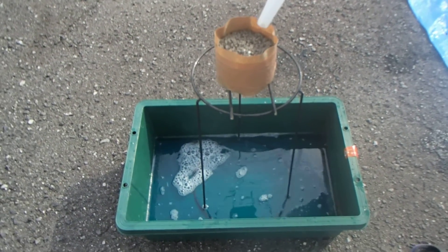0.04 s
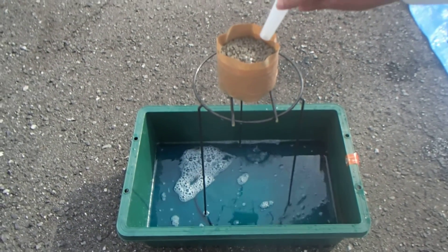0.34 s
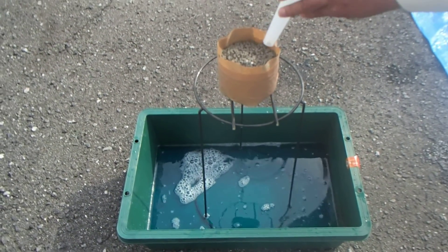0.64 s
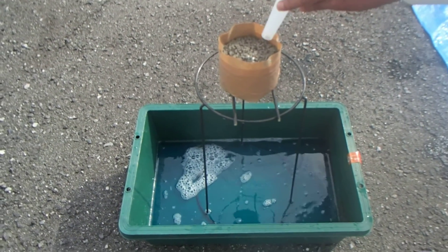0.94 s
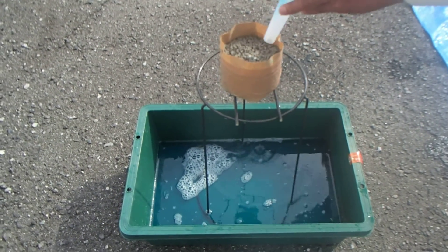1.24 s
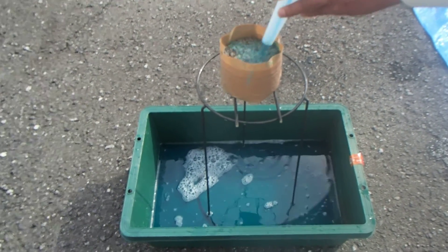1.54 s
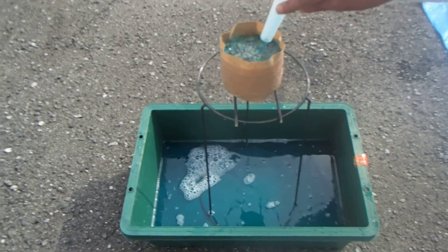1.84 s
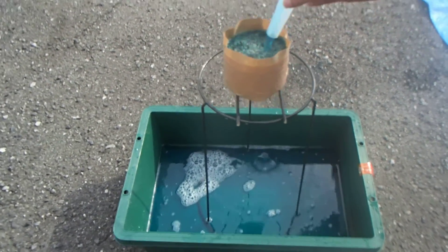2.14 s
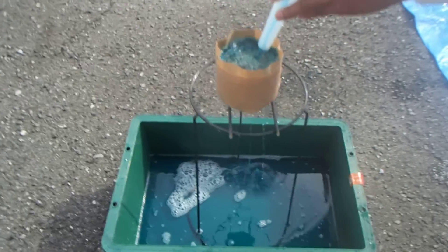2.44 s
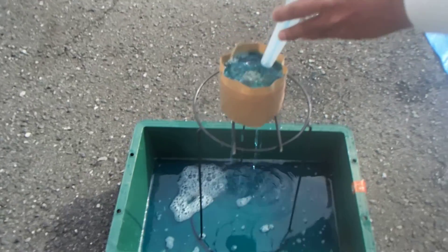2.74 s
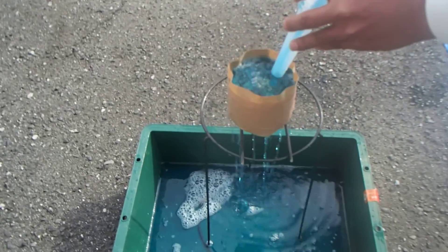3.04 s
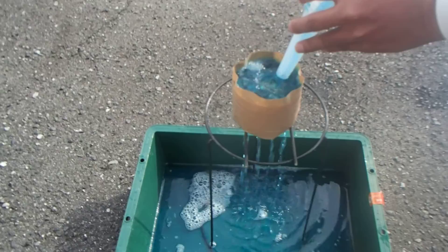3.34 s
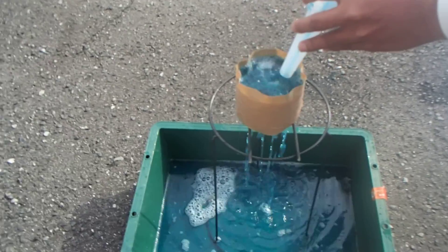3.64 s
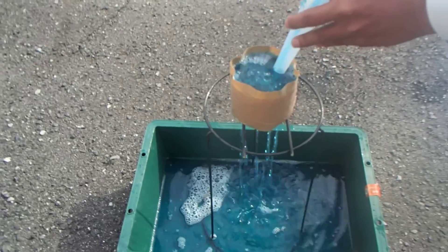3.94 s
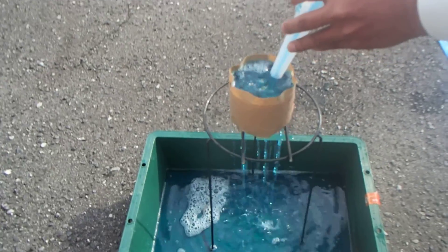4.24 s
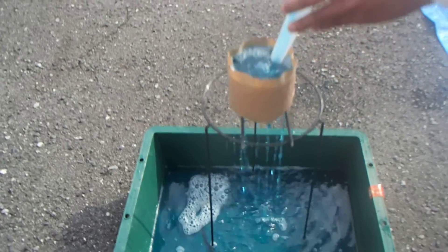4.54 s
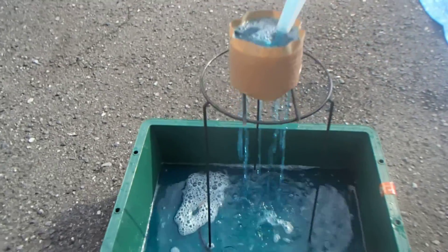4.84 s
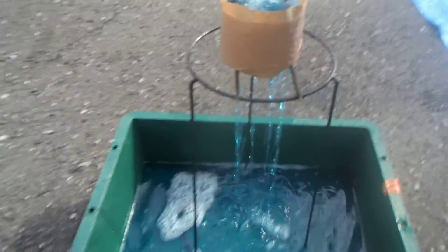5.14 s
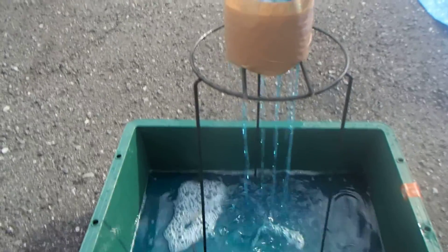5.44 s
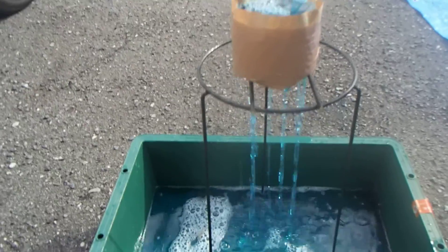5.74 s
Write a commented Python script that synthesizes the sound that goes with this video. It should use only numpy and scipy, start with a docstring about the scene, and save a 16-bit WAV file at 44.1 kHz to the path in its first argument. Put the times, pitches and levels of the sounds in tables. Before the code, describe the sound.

Water from a hose fills a perforated cup, dripping and then streaming into a tub of water outdoors with bright splashing and gurgling.

```python
"""Water drips, then streams from a perforated cup into a plastic tub as a hose fills the cup.
Outdoors, close to the microphone, each splash is a tick, a puff of spray and a few ringing air
bubbles, echoed by the tub walls; one flow drives both the splashing and the gurgling.
Far behind, a car fades into the hush of the street, and now and then air bumps the microphone."""
import sys
import numpy as np
from scipy import signal
from scipy.fft import rfft, irfft
from scipy.io import wavfile
from scipy.ndimage import uniform_filter1d

SR = 44100
rng = np.random.default_rng(int(sys.argv[2]) if len(sys.argv) > 2 else 0)


def log_audio(samples):
    """Write samples as a 16-bit WAV file to the path given in sys.argv[1]."""
    # one column per channel
    frames = np.atleast_2d(samples).T
    # limit to full scale, then quantise
    limited = np.clip(frames, -1, 1)
    pcm = np.round(limited * 32767).astype(np.int16)
    wavfile.write(sys.argv[1], SR, pcm)


N = 263718
T = np.arange(N) / SR
TRICKLE_S, OPENING_S = 2.5, 0.8  # the holes start to trickle, and take this long to run freely


# Tone of the splashing, close up: f/Hz, level/dB
SPLASH_SPECTRUM = [(250, -20.5), (480, -7.5), (760, -22), (1500, -13), (2150, -8), (3100, 1), (3800, 3.5),
                   (4150, -3), (4800, 4), (6200, 4), (7100, -0.5), (10500, 1), (12000, -10.5), (15500, -14)]
# First dribbles from the cup: t/s, half length/s, level/dB
FIRST_DRIBBLES = [(2.137, .04, -38.5), (2.798, 0.044, -44)]

def streams(open_db=-32, surge_db=3.0):
    """Near the microphone, wobbling streams from the holes break into beads and splash into the tub."""
    per_s = np.interp(T, [TRICKLE_S, TRICKLE_S + OPENING_S], [100, 230])
    splashes = beads(per_s, scatter_db=5.5, cycles=6.0, tick_db=-14, low_hz=2013)
    splashes = colour(splashes, SPLASH_SPECTRUM) * undb(surge_db * drift(50))
    dribbles = sum(undb(db) * bell_curve(s, half_s) for s, half_s, db in FIRST_DRIBBLES)
    return even(splashes, 0.082) * (undb(open_db + flow_db() + lulls_db()) + dribbles)


def beads(per_s, scatter_db, cycles, tick_db, low_hz, high_hz=13700, spray_db=-15.5, lag_s=.004):
    """Each bead of water lands with a tick, throws spray and leaves three small bubbles ringing."""
    landed = np.cumsum(per_s) / SR
    out = np.zeros(N)
    for k in range(int(landed[-1])):
        s = np.searchsorted(landed, k + 4 * rng.random()) / SR
        size = undb(scatter_db * np.clip(rng.standard_normal(), -2, 1.6))
        add(out, s, size * (undb(tick_db) * burst(0.00026) + undb(spray_db) * burst(0.0024)))
        for place, late, loud, damping in rng.random(size=(3, 4)):
            hz = low_hz + (high_hz - low_hz) * place ** 1.312
            gain = size * undb(8 * (loud - 1)) * np.sqrt(hz / high_hz)
            ring = bubble(hz, cycles * 2 ** (2 * damping - 1))
            add(out, s - lag_s * np.log(1 - late), gain * ring)
    return out


def bubble(hz, cycles, rise=0.041, swell=0.67, fall=1.11):
    """Trapped air swells within a cycle or so, rings down and rises in pitch as it nears the surface."""
    age = np.arange(int(6 * cycles * SR / hz) + 8) * hz / SR  # in cycles
    envelope = (1 - np.exp(-(age / swell) ** 2)) * np.exp(-(age / cycles) ** fall)
    return envelope / envelope.max() * np.sin(2 * np.pi * (age + rise * age ** 2 / cycles / 2))


def flow_db(opening_db=17, growth_db_per_s=2.02):
    """A trickle opens into full flow; after that the level slowly creeps upward."""
    open_s = T - TRICKLE_S - OPENING_S
    return opening_db * np.minimum(open_s / OPENING_S, 0) + growth_db_per_s * np.maximum(open_s, 0)


# Single big drops in the tub: t/s, level/dB, bubble f/Hz, ring/cycles
BIG_DROPS = [(1.0445, -16, 8850, 4), (1.2506, -23.5, 4850, 4.5), (1.3208, -22.5, 4640, 4.1),
             (1.346, -18, 9800, 6.2), (1.3841, -25, 4940, 4.5), (1.952, -7, 8000, 2.8),
             (2.0808, -18, 5430, 5.7), (2.1565, -19, 2700, 3.7), (2.3067, -22.5, 3410, 5),
             (2.4191, -19.5, 4370, 4.8), (2.4507, -15, 6060, 4.5), (2.7292, -6.5, 9400, 3.5),
             (2.8905, -3, 5580, 7.5), (3.0862, -6.5, 5830, 3.2), (3.1667, -8.5, 9670, 5.6),
             (3.295, -8.5, 5290, 3.9), (3.3104, -3, 6000, 2.6), (3.3651, -1.5, 5250, 2.9),
             (3.4656, -1, 9600, 3.1), (3.5293, -6.5, 5570, 4.7), (3.5523, -3.5, 9680, 5),
             (3.691, -4.5, 4485, 4.9), (3.7349, -3.5, 4585, 4.7), (3.8082, -6, 5600, 4),
             (3.855, -7, 5700, 4.5), (3.9437, -6, 8700, 4.5), (3.9725, -8.5, 5410, 3.6),
             (4.2166, -14, 3890, 6.4), (4.2616, -6, 5404, 3.4), (4.2857, -14.5, 3000, 4.5),
             (4.351, -3.5, 6750, 2.9), (4.3986, -5.5, 6290, 3.6), (4.4617, -3, 6330, 4.5),
             (4.4929, -8.5, 6100, 4.5), (4.6135, -2.5, 4900, 3.6), (4.7018, -8.5, 6160, 4.5),
             (4.7603, -10, 3570, 5.3), (4.8842, -3.5, 6500, 3.8), (4.9249, 0, 10330, 4.9),
             (4.982, -6.5, 4980, 4.5), (5.0566, -6, 7600, 5.6), (5.1157, -1, 5260, 3.9),
             (5.1345, -4, 5126, 7.1), (5.245, -5, 5940, 5), (5.3102, -9.5, 3030, 6.3),
             (5.3765, -1, 6540, 3.7), (5.387, 0.5, 6395, 2.8), (5.4096, -3.5, 6030, 4.9),
             (5.4906, -2, 5140, 1.6), (5.5762, -3, 4960, 3.4), (5.685, -10, 2850, 6),
             (5.8971, -5, 4780, 4.3), (5.913, -6, 2920, 4.5)]

def big_drops(delay_s=0.001, tick_db=-24, spray_db=-14, ring_db=-1.5):
    """A big drop lands with a tick, a ringing bubble and spray of that pitch."""
    out, ticks = np.zeros(N), np.zeros(N)
    for s, db, hz, cycles in BIG_DROPS:
        onset_s = s + delay_s
        add(ticks, onset_s, undb(db) * burst(0.0013))
        add(out, onset_s, undb(db + ring_db) * bubble(hz, cycles, rise=0.018, swell=0.82, fall=2.1))
        spray = resonate(resonate(burst(0.0031), hz, hz), hz, 2 * min(hz, 6000))
        add(out, onset_s, at_peak(spray, db + spray_db))
    return out + undb(tick_db) * colour(ticks, SPLASH_SPECTRUM)


# Slack moments in the splashing: t/s, half length/s, level/dB
SPLASH_LULLS = [(2.882, 0.021, -13), (3.35, 0.018, -4), (4.033, 0.041, -5.5), (4.506, .04, -4),
                (4.71, 0.0218, -3), (4.867, 0.012, -7), (5.16, 0.043, -6.5), (5.35, .012, -1.5)]

def lulls_db(neck_lead_s=0.0088, neck_half_s=0.008, neck_db=-5):
    """The splashing slackens briefly, and dips as a stream necks just before shedding a big drop."""
    slack = sum(db * bell_curve(s, half_s) for s, half_s, db in SPLASH_LULLS)
    necks = np.zeros(N)
    for s, *_ in BIG_DROPS:
        add(necks, s - neck_lead_s - neck_half_s, neck_db * np.hanning(int(2 * neck_half_s * SR)))
    return slack + necks


# Tone of the froth in the cup: f/Hz, level/dB
FROTH_SPECTRUM = [(2000, -54), (3000, -6.5), (4200, -10.5), (4900, 0.5), (7000, -2), (10500, -6.5),
                  (13000, -10.5), (15500, -25.5)]

def froth(per_s=260, surge_db=3.5):
    """Up in the cup, the hose jet whips up a fine, high sizzle."""
    sizzle = beads(np.full(N, per_s), scatter_db=10.5, cycles=5.0, tick_db=-1, low_hz=2640)
    sizzle = colour(sizzle, FROTH_SPECTRUM) * undb(surge_db * drift(45))
    return even(sizzle, 0.098) * jet() * undb(lulls_db())


# The hose spitting into the cup: t/s, length/s, level/dB
HOSE_SPURTS = [(1.268, .40, -42), (1.70, 0.15, -50), (1.97, 0.035, -42), (2.092, .13, -42),
               (2.293, 0.047, -47.5), (2.40, 0.073, -42.5), (2.59, 0.2, -37)]

def jet(edge_s=0.045, start_s=2.26, rise_s=1.26, full_db=-36.5, sink_db_per_s=2.5):
    """Strength of the hose jet: a few spurts, then a steady run that the rising water quietens."""
    spurts = sum(undb(db) * np.clip(1 + np.minimum(T - s, s + length - T) / edge_s, 0, 1)
                 for s, length, db in HOSE_SPURTS)
    build_up = np.clip((T - start_s) / rise_s, 0, 1) ** 2
    steady = build_up * undb(full_db - sink_db_per_s * np.maximum(T - start_s - rise_s, 0))
    return np.hypot(spurts, steady)


def gurgle(count=700, low_hz=780, high_hz=2500, scatter_db=8.0, slosh_db=-17, deepen_db_per_s=1.05):
    """Larger bubbles are dragged under with a soft slosh, louder as the streams plunge deeper."""
    out = np.zeros(N)
    for k in range(count):
        when, place, damping = rng.random(size=3)
        s = (k + when) / count * N / SR
        size = undb(scatter_db * np.clip(rng.standard_normal(), -2, 2))
        hz = low_hz * (high_hz / low_hz) ** place
        ring = bubble(hz, cycles=6 * 2 ** (2 * damping - 1), rise=0.0754)
        add(out, s, size * ring * (.5 + place / 2))
        slosh = resonate(resonate(burst(0.0081), 864, 2100), 864, 2100)
        add(out, s, size * undb(slosh_db) * unit(slosh))
    gulps = undb(3 * drift(28))
    plunge_db = deepen_db_per_s * (T - TRICKLE_S - OPENING_S)
    level_db = -46 + 0.65 * flow_db() + plunge_db + 1.57 * lulls_db()
    return even(out * gulps, 0.26) * undb(level_db)


# Big gulps of air down in the tub: t/s, level/dB, f/Hz
AIR_GULPS = [(3.167, -38, 743), (3.198, -39, 744), (3.276, -27.5, 1780), (3.531, -18.5, 2200),
             (3.607, -30, 1310), (3.674, -26, 1464), (3.693, -27, 1720), (3.914, -28.5, 988),
             (4.3, -21.5, 2100), (4.326, -28.5, 1242), (4.634, -29, 1110), (4.725, -30.5, 716),
             (4.909, -29.5, 758), (4.985, -30, 855), (5.1, -33.5, 804), (5.357, -26, 762),
             (5.481, -26.5, 1690), (5.653, -28.5, 750)]

def glugs(gap_s=0.0091, pitch_step=0.99, weaker_db=-7, slosh_db=-4):
    """A gulp of air sloshes and breaks into three quick bubbles, each weaker and a shade lower."""
    out = np.zeros(N)
    for s, db, hz in AIR_GULPS:
        slosh = resonate(burst(0.014), hz, hz)
        add(out, s, at_peak(slosh, db + slosh_db))
        for k, chance in enumerate(rng.random(size=3)):
            ring = bubble(hz * pitch_step ** k, cycles=4.9)
            add(out, s + k * gap_s * (0.65 + chance / 2), undb(db + k * weaker_db) * ring)
    return out


# Faint pitched drips and light, dull taps: t/s, level/dB, f/Hz
DRIPS_AND_TAPS = [(.340, -27.5, 3370), (.358, -27, 2960), (1.25, -28, 2400), (1.957, -20, 1100),
                  (1.959, -33.5, 324), (1.972, -23, 2930)]

def drips_and_taps(decay_s=0.0022):
    """Faint drips and dull taps close by, each a short burst ringing briefly at one pitch."""
    out = np.zeros(N)
    for s, db, hz in DRIPS_AND_TAPS:
        width_hz = min(hz / 2, 1000)
        tap = resonate(resonate(burst(decay_s), hz, width_hz), hz, 2 * width_hz)
        add(out, s, at_peak(tap, db))
    return out


# Resonances of the air in the tub: f/Hz, width/Hz, level/dB
TUB_AIR_MODES = [(425, 114, 0), (740, 64, 1.5), (1010, 87, -7.5), (1710, 490, -9.5), (3080, 160, -34)]

def tub(direct, walls_db=-12, walls_s=0.0037, yard_db=-22, yard_s=.025, modes_db=-3):
    """The microphone hears the direct sound, quick wall echoes, a faint yard tail and ringing tub air."""
    t = T[:8192]
    fade = sum(undb(db) * np.exp(-t / s) * np.sqrt(2 / s / SR)
               for db, s in [(walls_db, walls_s), (yard_db, yard_s)])
    fade *= t > .001  # the first echo arrives after 1 ms
    # the splashes wander over the surface, so the echo pattern keeps changing
    shares = np.array([drift(20) for _ in range(4)])
    shares /= np.linalg.norm(shares, axis=0)
    echoes = sum(signal.fftconvolve(direct * share, fade * rng.standard_normal(len(t)))[:N]
                 for share in shares)
    ringing = sum(undb(db + modes_db) * resonate(direct, hz, width) for hz, width, db in TUB_AIR_MODES)
    return direct + echoes + ringing


# Puffs of air right at the microphone: t/s, level/dB, f/Hz
MIC_BUMPS = [(1.482, -31, 79), (2.844, -34, 124), (4.484, -32, 94), (4.721, -30.5, 122),
             (5.710, -27.5, 158), (5.736, -29.5, 150), (5.884, -28, 135)]

def mic_bumps(swell_s=0.0056):
    """Air bumps the microphone: soft low thuds that swell and die within a few cycles."""
    out, t = np.zeros(N), T[:4096]
    for s, db, hz in MIC_BUMPS:
        rumble = resonate(resonate(rng.standard_normal(len(t)), hz, hz), hz, hz)
        add(out, s, at_peak(rumble * t * np.exp(-t / swell_s), db))
    return out


# Tone of tyres at a distance: f/Hz, level/dB
TYRE_SPECTRUM = [(60, -17), (160, -8.5), (450, -11), (1100, -4.5), (1800, -13.5), (3500, -19),
                 (5800, -20.5), (8000, -34), (15000, -48)]

def distant_car(nearest_db=-37.5, fade_db=19.5, leaving_s=0.53):
    """The tyre noise of a far car fades as it draws away from the microphone."""
    tyres = unit(colour(rng.standard_normal(N), TYRE_SPECTRUM))
    return tyres * undb(nearest_db - fade_db * np.log10(1 + (T / leaving_s) ** 2))


# Tone of the street in the background: f/Hz, level/dB
STREET_SPECTRUM = [(15, -47), (25, -1), (82, -3), (215, -2.5), (246, -3.5), (378, -4), (410, -7),
                   (782, -6.5), (1140, -5.5), (2230, -11.5), (3170, -16), (15500, -24)]
# Slow swell and ebb of its traffic: t/s, level/dB
TRAFFIC_SWELL = [(0, -.5), (2.3, 1.5), (3.5, -2.5), (6, 0)]

def street(hush_db=-44.5, drone_hz=81, width_hz=12.7, drone_db=-60):
    """Far traffic merges into an outdoor hush with a low engine drone."""
    hush = unit(colour(rng.standard_normal(N), STREET_SPECTRUM))
    drone = unit(resonate(resonate(rng.standard_normal(N), drone_hz, width_hz), drone_hz, width_hz))
    swell = undb(np.interp(T, *np.transpose(TRAFFIC_SWELL)))
    return (undb(hush_db) * hush + undb(drone_db) * drone) * swell


def undb(db):
    """Decibels to gain."""
    return 10 ** (np.asarray(db) / 20)


def unit(x):
    """Scale to rms 1."""
    return x / np.sqrt(np.mean(x ** 2))


def at_peak(x, db):
    """Scale to the given peak level."""
    return undb(db) * x / np.abs(x).max()


def even(x, span_s):
    """Hold a stream of grains near rms 1 over the given span."""
    span = int(span_s * SR)
    power = uniform_filter1d(uniform_filter1d(x ** 2, span), span)
    return x / np.sqrt(np.maximum(power, 0) + 0.0072 * np.mean(x ** 2))


def colour(x, points):
    """Causal filter with the given response: f/Hz, level/dB."""
    hz, db = np.transpose(points)
    f = np.maximum(np.fft.rfftfreq(4096, 1 / SR), 1)
    cepstrum = irfft(np.log(undb(np.interp(np.log(f), np.log(hz), db))))
    half = len(cepstrum) // 2
    cepstrum[1:half] *= 2  # fold to minimum phase
    cepstrum[half + 1:] = 0
    return signal.fftconvolve(x, irfft(np.exp(rfft(cepstrum))))[:len(x)]


def resonate(x, hz, width_hz):
    """Two-pole resonance, gain 1 at its centre."""
    return signal.lfilter(*signal.iirpeak(hz, hz / width_hz, fs=SR), x)


def burst(decay_s):
    """A dying puff of noise."""
    return rng.standard_normal(1024) * np.exp(-T[:1024] / decay_s)


def drift(per_s):
    """Smooth random drift with a spread near 1."""
    knots = rng.standard_normal(1024)
    return np.interp(T * per_s, np.arange(len(knots)), knots)


def bell_curve(s, half_s):
    """A smooth hump of height 1 centred on time s."""
    return np.exp(-((T - s) / half_s) ** 2)


def add(out, s, sound):
    """Mix a short sound in at time s."""
    i = int(np.clip(s * SR, 0, N))
    out[i:i + len(sound)] += sound[:N - i]


def scene(water_db=1.42):
    """One microphone outdoors: the cup and tub close by, the street and the car far behind."""
    water = tub(big_drops() + froth() + streams() + gurgle() + glugs() + drips_and_taps())
    return (undb(water_db) * water + street() + distant_car() + mic_bumps())[None]


def record(dry, top_hz=15900):
    """The recorder clips the sharpest drops and cuts the top."""
    lowpass = signal.ellip(10, .2, 70, top_hz, fs=SR, output="sos")
    return signal.sosfilt(lowpass, np.clip(dry, -1, 1))


dry = scene()
out = record(dry)
log_audio(out)
```